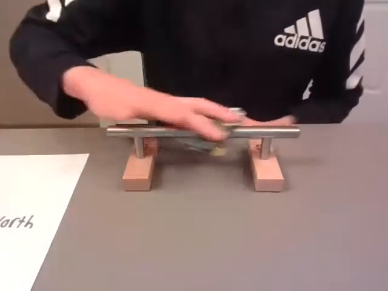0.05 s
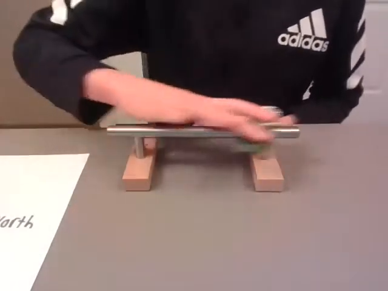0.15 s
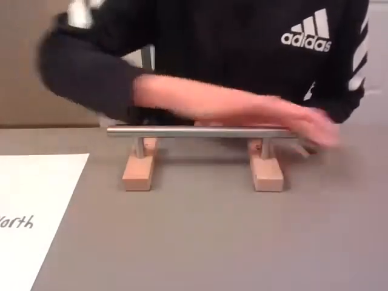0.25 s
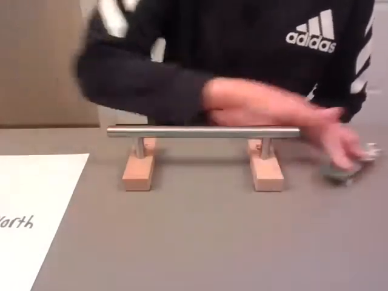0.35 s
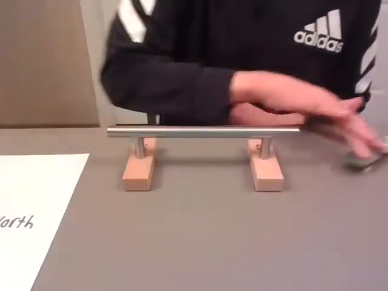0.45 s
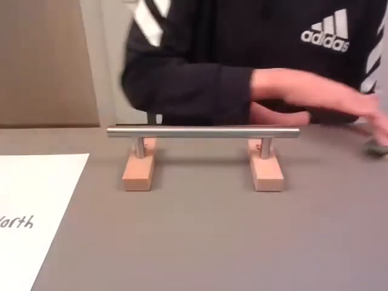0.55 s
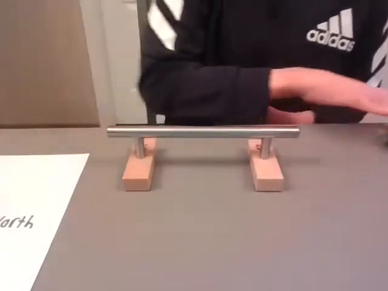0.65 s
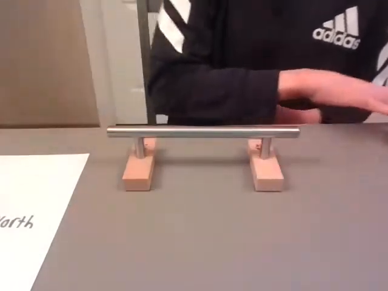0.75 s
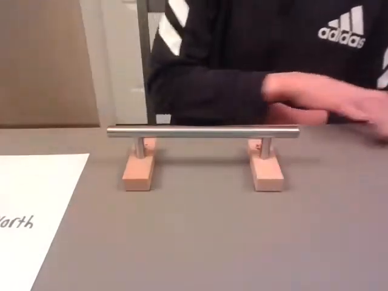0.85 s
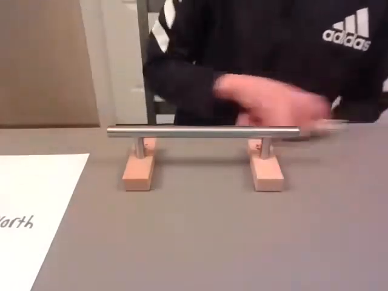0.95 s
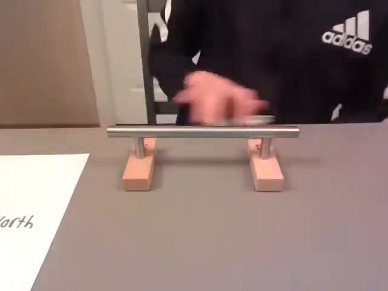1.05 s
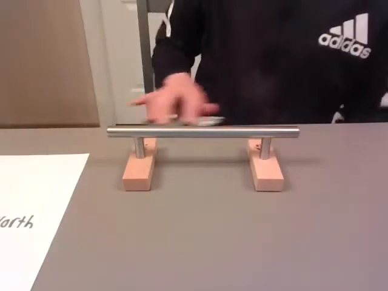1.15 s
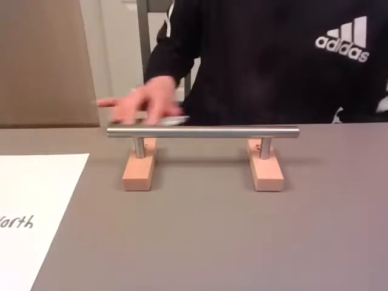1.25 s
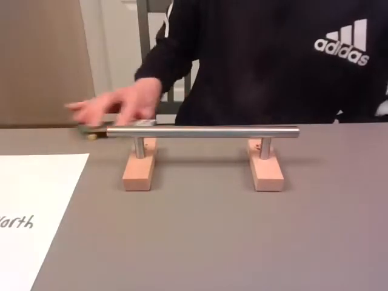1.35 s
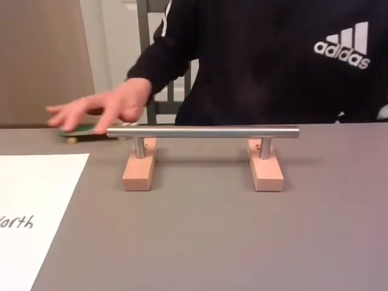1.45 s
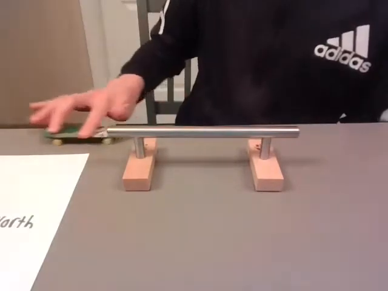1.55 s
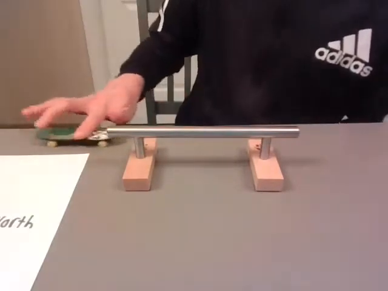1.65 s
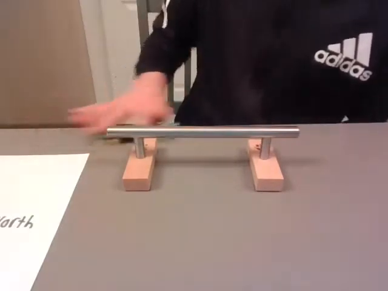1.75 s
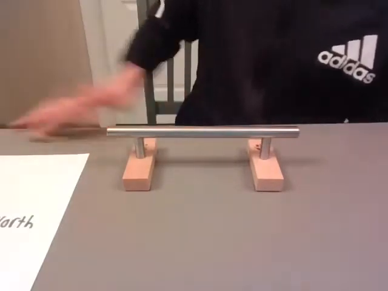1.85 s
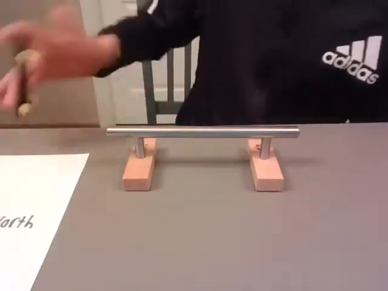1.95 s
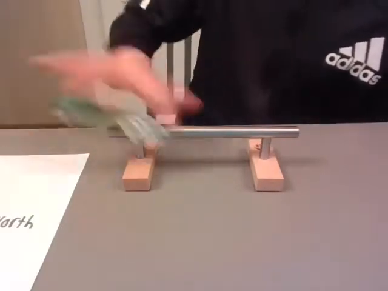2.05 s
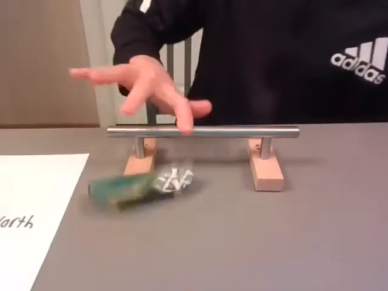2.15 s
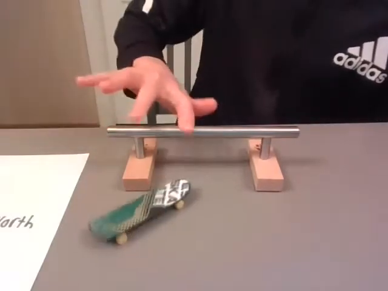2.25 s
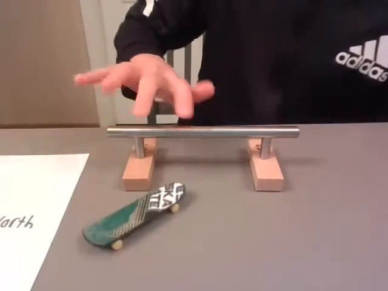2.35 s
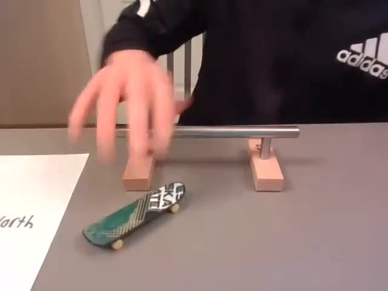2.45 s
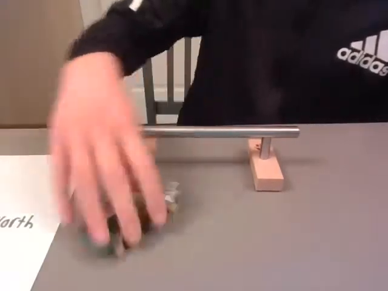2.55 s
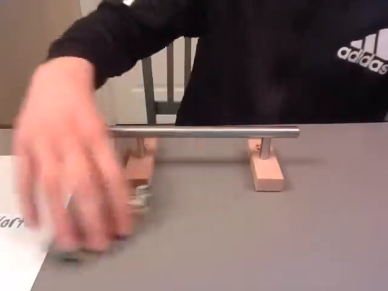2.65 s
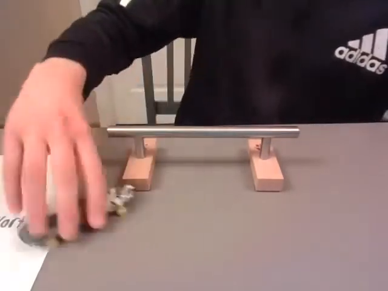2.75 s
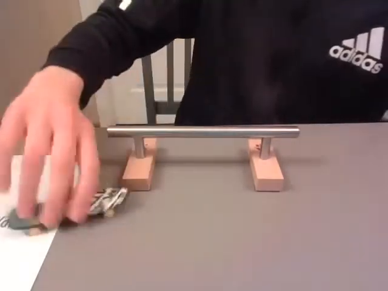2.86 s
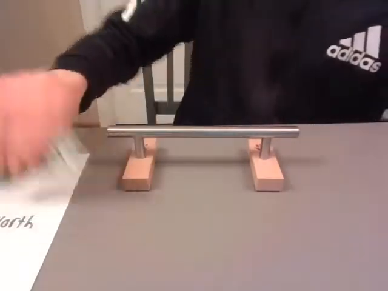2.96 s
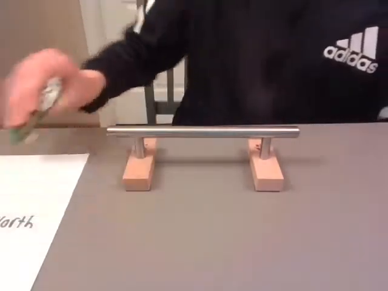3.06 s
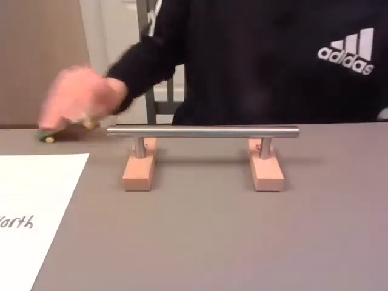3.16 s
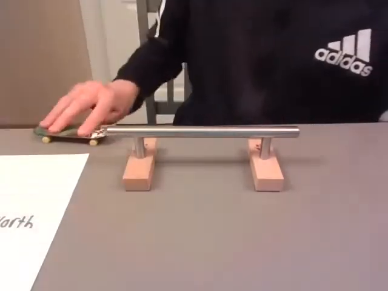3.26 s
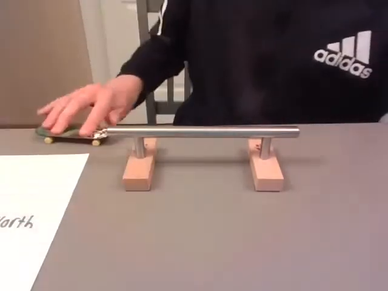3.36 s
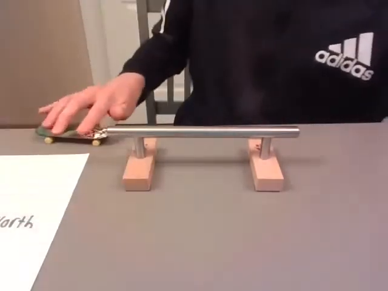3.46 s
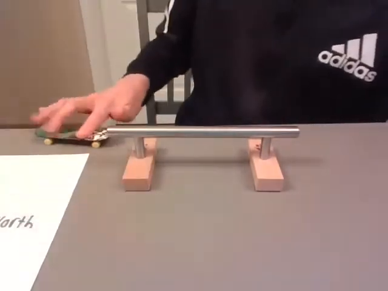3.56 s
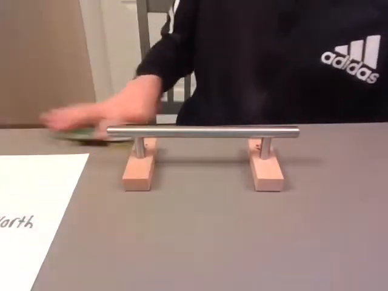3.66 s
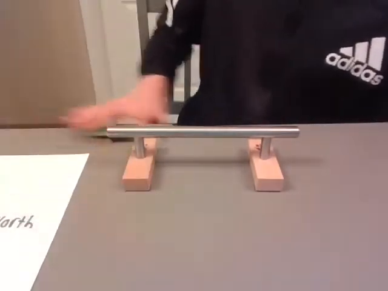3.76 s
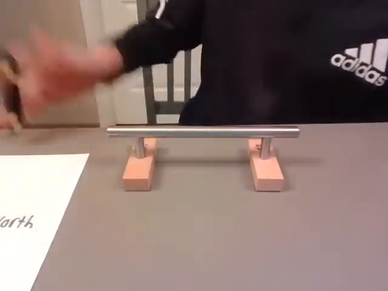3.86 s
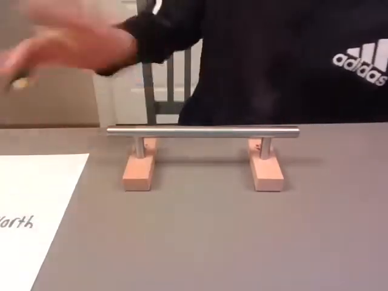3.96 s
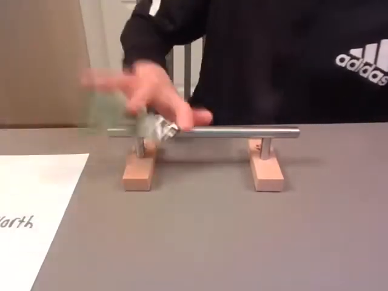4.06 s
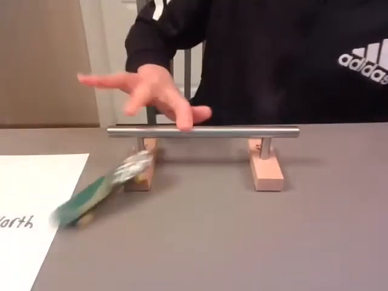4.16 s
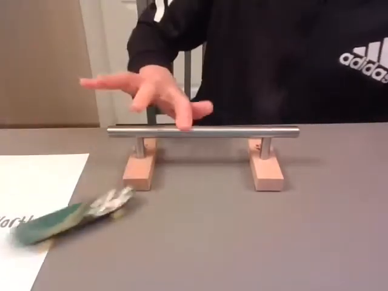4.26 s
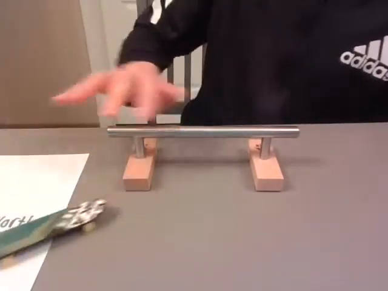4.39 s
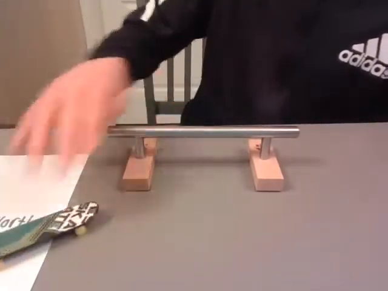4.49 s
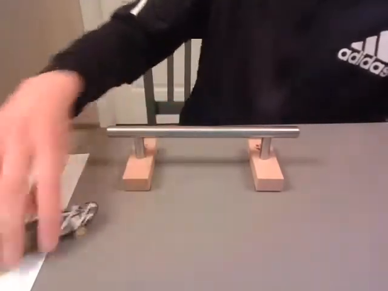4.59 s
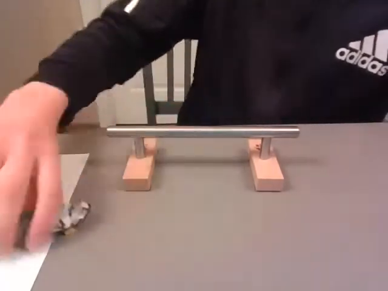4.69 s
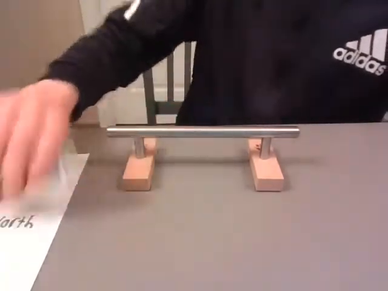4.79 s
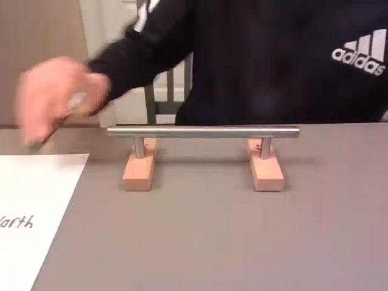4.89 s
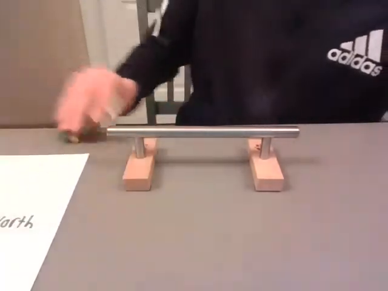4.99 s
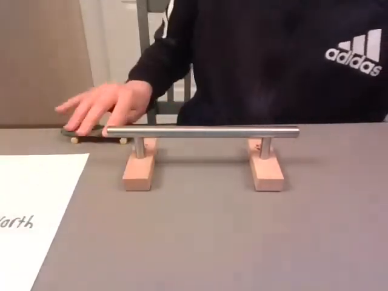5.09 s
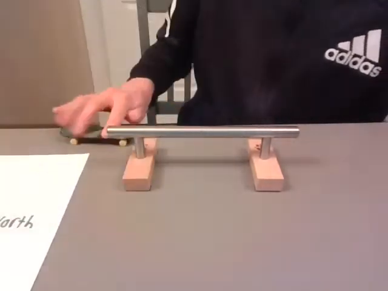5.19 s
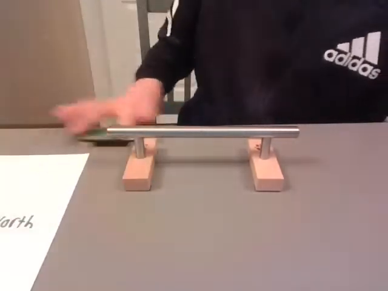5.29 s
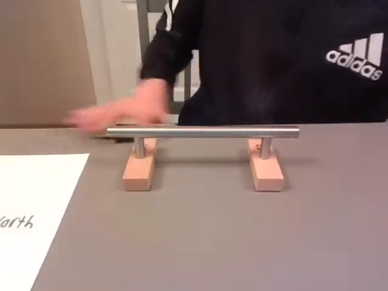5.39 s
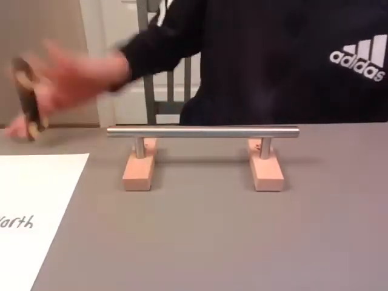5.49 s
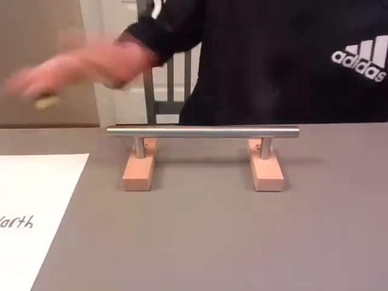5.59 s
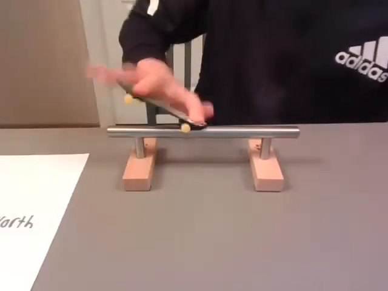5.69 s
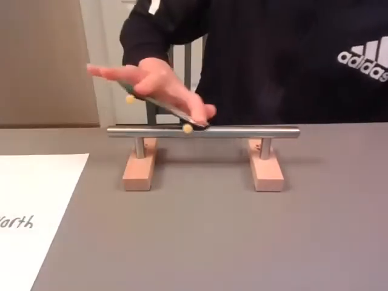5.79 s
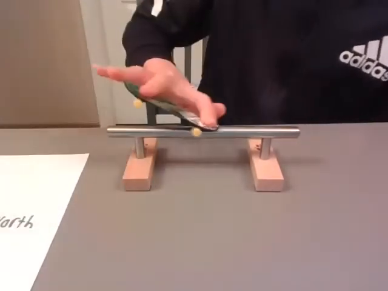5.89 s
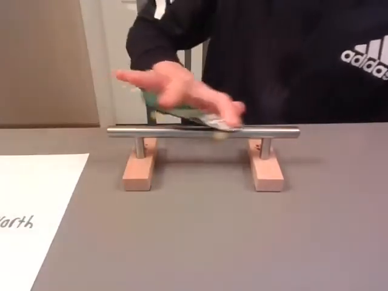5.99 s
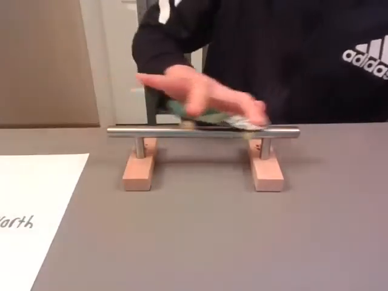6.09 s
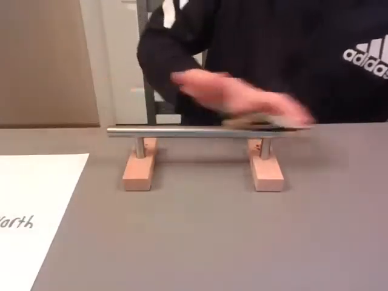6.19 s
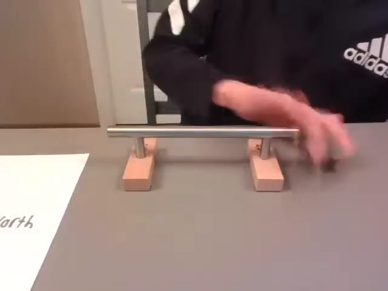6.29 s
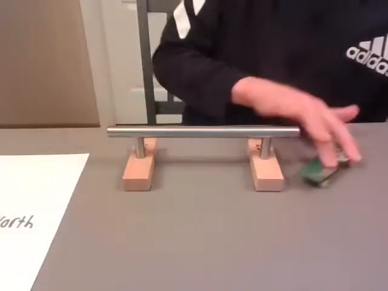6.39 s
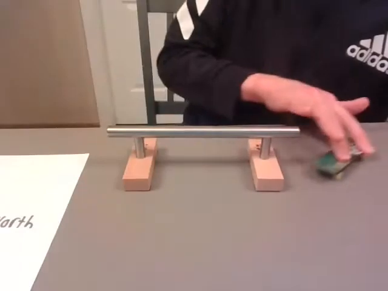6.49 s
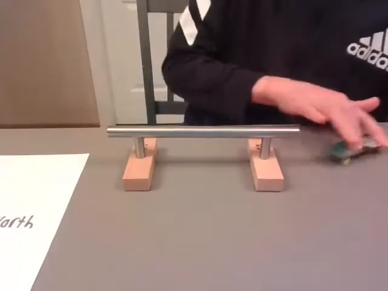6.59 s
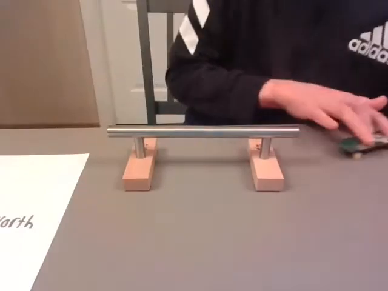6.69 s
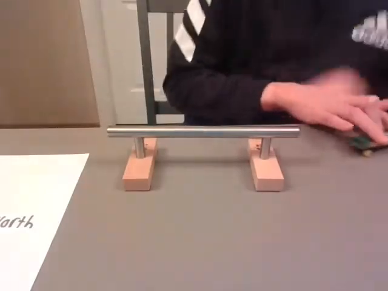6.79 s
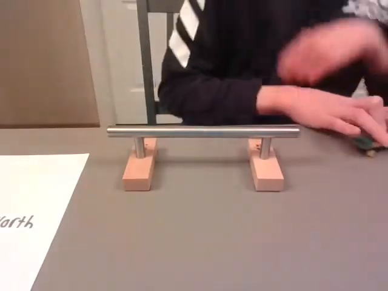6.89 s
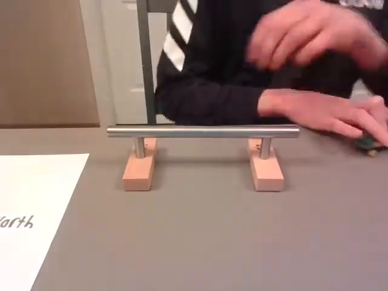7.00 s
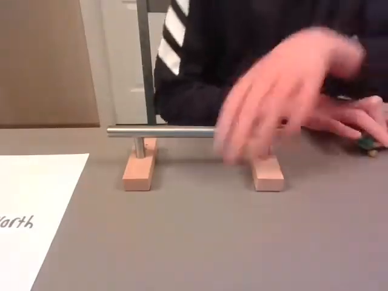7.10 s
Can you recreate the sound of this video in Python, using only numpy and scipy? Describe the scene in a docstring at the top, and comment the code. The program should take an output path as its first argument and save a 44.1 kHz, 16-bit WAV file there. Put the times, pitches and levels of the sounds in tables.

```python
"""A small metal truck scrapes briefly along a steel rail, then a fingerboard clatters, rolls and squeaks on a table.
Blows are noise bursts for the cracking deck plus decaying modes for its metal trucks and the booming table.
Wheels and rail are uneven contact noise that excites resonances; squeaks are gliding stick-slip tones.
After some pops the deck rings freely; the reflections of a small, bare room and its quiet air surround it all.
"""
import sys
import numpy as np
from scipy import signal
from scipy.fft import rfft, irfft, next_fast_len
from scipy.io import wavfile

SR = 44100
rng = np.random.default_rng(int(sys.argv[2]) if len(sys.argv) > 2 else 0)


def persist_wave(psi):
    """Save psi, clipped to +-1, as 16-bit WAV."""
    counts = np.round(np.clip(psi, -1, 1) * 32767).astype(np.int16)
    wavfile.write(sys.argv[1], SR, np.atleast_2d(counts).T)


N = 314874
TIME = np.arange(N) / SR

# run-ups, each a soft push, a hard push and a pop of the tail:
# pop t/s, soft push level/dB, hard push level/dB, hard push length/s, crack level/dB
RUN_UPS = [(1.869, -2, 0, 0.071, -14.5), (3.817, -5, 0, 0.07, -16), (5.448, -10.5, -3, 0.072, -18.5)]


def undb(db):
    """Level as a logarithm of amplitude: decibels to gain."""
    return 10 ** (np.asarray(db) / 20)


def unit(x):
    """Normalisation of the mean power: rms 1."""
    return x / np.sqrt(np.mean(x ** 2))


def fade(t, t60):
    """Exponential decay of a damped system, 60 dB down after t60."""
    return np.exp(-np.log(1000) * t / max(t60, 1 / SR))


def along(points, hz):
    """Interpolation of (f/Hz, value) points on a log-frequency axis."""
    f, value = np.transpose(points)
    return np.interp(np.log(hz + 1), np.log(f), value)


def colour(x, points):
    """Linear filtering: the spectrum is multiplied by gains given as (f/Hz, level/dB)."""
    size = next_fast_len(x.shape[-1], real=True)
    gain = undb(along(points, np.fft.rfftfreq(size, 1 / SR)))
    return irfft(rfft(x, size) * gain, size)[..., :x.shape[-1]]


def resonate(x, peaks):
    """Forced vibration of parallel damped resonators (f/Hz, width/Hz, level/dB)."""
    size = next_fast_len(x.shape[-1], real=True)
    f = np.fft.rfftfreq(size, 1 / SR) + 1
    response = sum(undb(db) / (1 + 1j * (f * f - hz * hz) / (f * width)) for hz, width, db in peaks)
    return irfft(rfft(x, size) * response, size)[..., :x.shape[-1]]


def spread(mid, side, side_db):
    """Mid-side stereo from two unrelated signals; the width depends on frequency."""
    # side minus mid before side_db is added: f/Hz, level/dB
    side_spectrum = [(100, -2.5), (400, -9.5), (1000, -12.5), (2000, 2), (8000, -2), (16000, -9.5)]
    return mid + undb(side_db) * colour(side, side_spectrum) * np.array([[1], [-1]])


def walk(rate):
    """Slow random drift: straight lines between normal draws, rate of them per second."""
    knots = np.arange(0, TIME[-1] + 1, 1 / rate)
    return np.interp(TIME, knots, rng.standard_normal(len(knots)))


def swell(curve):
    """Amplitude envelope along rows (t/s, level/dB), fading to silence outside them."""
    s, db = np.transpose(curve)
    edge = 0.025  # s
    window = np.interp(TIME, [s[0] - edge, s[0], s[-1], s[-1] + edge], [0, 1, 1, 0]) ** 2
    return undb(np.interp(TIME, s, db)) * window


def add(out, s, sound):
    """Superposition: mix a sound in at time s."""
    start = max(int(s * SR), 0)
    out[:, start:start + sound.shape[-1]] += sound[..., :N - start]


def ring(modes, t, scatter_db, detune):
    """Free modal vibration; the point of impact and the grip change the shares and pitch of the modes."""
    chance = rng.standard_normal((len(modes), 3))
    total = 0
    for (hz, db, t60), (level, shift, sign) in zip(modes, chance):
        gain = undb(db + scatter_db * level) * np.sign(sign)
        total = total + gain * np.sin(2 * np.pi * hz * (1 + detune * shift) * t) * fade(t, t60)
    return total


def burst(spectrum, t, hold, t60, side_db, hz=0, formant_db=-60):
    """High modal density acts as noise: short-lived deck modes, driven while the contact chatters."""
    noise = colour(rng.standard_normal((2, len(t))), spectrum)
    noise = noise + resonate(noise, [(hz, 900, formant_db)])  # formant of the struck part
    shape = fade(np.maximum(t - hold, 0), t60) * (1 - fade(t, 0.0057)) ** 2
    return unit(spread(*noise, side_db)) * shape


def asperities(grain_db):
    """Friction at rough surfaces: a dense train of tiny contacts of very uneven size."""
    sizes = np.repeat(rng.exponential(size=N // 16 + 1), 16)[:N]
    return unit(rng.standard_normal(N) * undb(grain_db * sizes))


def texture(grain_db, flutter_db, side_db):
    """Amplitude modulation of stereo contact noise by a fluttering pressure."""
    return spread(asperities(grain_db), asperities(grain_db), side_db) * undb(flutter_db * walk(70))


def waver(x, drift_s):
    """Doppler-like modulation by a drifting delay: shifting finger pressure bends the resonances a little."""
    late = TIME - drift_s * walk(18)
    return unit(np.array([np.interp(late, TIME, channel) for channel in x]))


def glance(x, share, lag_s, drift_s):
    """Comb filtering: the late bounce off table and hand has notches that wander as the board moves."""
    late = TIME - lag_s - drift_s * walk(6.2)
    return unit(x + share * np.array([np.interp(late, TIME, channel) for channel in x]))


def strikes():
    """Impact excitation: blows as (t/s, crack/dB, knock/dB, formant f/Hz, chatter/s, thump/dB)."""
    # blows of the board:
    # t/s, crack level/dB, wooden knock relative level/dB, formant of the struck part f/Hz, contact chatter/s
    clack_table = [(0.2104, -14, -32, 4040, 0.0012), (0.2753, 3.5, -8.5, 14900, 0.001),
                   (0.2886, -6.5, -17, 6860, 0.002), (0.2923, 5.5, -13, 15000, 0.0012),
                   (2.0598, 2, -33, 11250, 0.0019), (2.0785, -3.5, -19, 7700, 0.0022),
                   (2.1042, -13.5, -44, 4490, 0.0023), (2.133, -2.5, -19.5, 4940, 0.0024),
                   (2.164, 1.5, -36, 14100, 0.0017), (2.174, -5, -18.5, 11900, 0.0033),
                   (2.2288, -5, -26.5, 7400, 0.0019), (2.2343, -4.5, -20.5, 12500, .0014),
                   (2.598, -23, -34.5, 5570, 0.0029), (2.83, -23.5, -36, 11900, 0.0012),
                   (2.9304, -34.5, -43, 7140, .004), (3.1527, -5.5, -28.5, 14000, 0.00053),
                   (3.2316, -10.5, -26.5, 12900, 0.0026), (3.8426, -18, -41.5, 12500, 0.0017),
                   (4.0344, -4, -32, 13600, 0.0053), (4.0446, -1.5, -32, 13000, 0.0014),
                   (4.1183, 1, -13, 3900, 0.0019), (4.1582, -2.5, -32, 7100, 0.0015),
                   (4.167, -1.5, -26, 4130, 0.00096), (4.2379, -1, -28, 12900, 0.00086),
                   (4.2565, -11, -23, 12600, 0.0023), (4.6029, -25.5, -33.5, 5460, 0.0013),
                   (4.6558, -11.5, -24.5, 11400, 0.0018), (4.732, -18.5, -36.5, 13230, 0.0051),
                   (5.0075, -15, -31, 14900, 0.0032), (5.07, -11.5, -32, 7400, .0007),
                   (5.0859, -9, -23, 8840, .0007), (5.4572, -17.5, -45, 12700, 0.0027),
                   (5.6352, 4.5, -19, 10000, 0.0012), (6.2235, -26.5, -51.5, 7350, 0.0015),
                   (6.279, -8, -46, 7200, 0.0019), (6.2992, 0, -21, 12600, 0.0016),
                   (6.321, 0, -19.5, 14800, 0.0054), (6.3301, 1, -23, 14800, 0.0014)]
    # boom under a 0 dB crack (before the common trim of thumps), and dB of boom per dB of crack
    thump_db, thump_law = -36, 0.66
    pop_knock_db, pop_hz, pop_chatter_s, pop_thump_db = -36.5, 12840, 0.0059, -32.5
    blow_list = []
    for s, db, knock_db, hz, chatter in clack_table:
        blow_list.append((s, db, knock_db, hz, chatter, thump_db + thump_law * db))
    for s, *_, db in RUN_UPS:
        blow_list.append((s, db, pop_knock_db, pop_hz, pop_chatter_s, pop_thump_db))
    return blow_list


def blows(count=3):
    """Impact radiation at pops, landings and tumbles: deck cracks and knocks, trucks ring and rattle in their play."""
    # crack of the deck: f/Hz, relative level/dB
    deck_spectrum = [(1500, -13.5), (3000, -7), (5000, -2.5), (7500, 0), (9300, -1.5), (12500, 0),
                     (14500, -1.5), (16000, 5)]
    # wooden knock: f/Hz, relative level/dB
    knock_spectrum = [(150, -20), (350, -4), (600, -10.5), (1200, -2.5), (2400, -4.5), (4500, -13.5),
                      (8000, -29)]
    # modes of the metal trucks: f/Hz, relative level/dB, t60/s
    truck_modes = [(1200, -9, .2), (4520, -3, 0.2), (4882, -10, 0.18), (7160, -3.5, .16), (7830, -3, 0.13),
                   (11430, -7, .12), (12100, -3, .12), (12490, 1, .12)]
    metal_db, pan_db = -34, -0.5  # ring re the crack; left minus right
    pan = undb(np.array([[pan_db], [-pan_db]]) / 2)
    out, t = np.zeros((2, N)), np.arange(2 ** 13 + 2 ** 12) / SR
    for s, db, knock_db, hz, chatter, _ in strikes():
        crack = undb(db) * burst(deck_spectrum, t, chatter, t60=0.019, side_db=-2, hz=hz, formant_db=7)
        knock = undb(knock_db + 1.5) * burst(knock_spectrum, t, chatter, t60=0.025, side_db=-2.0)
        trucks = undb(db + metal_db) * ring(truck_modes, t, scatter_db=3.5, detune=0.0023)
        add(out, s, (crack + knock + trucks) * pan)
        for delay in rng.uniform(0.0079, 0.031, count):
            rattle = burst(deck_spectrum, t[:512], hold=0, t60=0.0063, side_db=0)
            add(out, s + delay, undb(db - 23.5) * rattle)
    return out


def flights():
    """Free vibration: lifted off the table, nothing damps the deck and its bending modes sing on."""
    # pops that leave the deck ringing in the air: t/s, relative level/dB
    pop_table = [(1.86, -48.5), (3.82, -38.5), (4.121, -38), (5.45, -41), (5.636, -43)]
    # bending modes of the free deck: f/Hz, relative level/dB, t60/s
    deck_modes = [(1210, -0.5, 0.37), (1326, -3, 0.66), (1440, -3, 0.55), (2080, -1, 0.25), (2260, -7.5, 1)]
    out, t = np.zeros((2, N)), np.arange(2 ** 14) / SR
    for s, db in pop_table:
        tone = ring(deck_modes, t, scatter_db=6.5, detune=0.011)
        add(out, s, undb(db - 7) * tone * (1 - fade(t, 0.017)))
    return out


def push(start, rise, hold, end, fall_db_per_s, stop):
    """Drive and frictional loss of the wheels, 0-1: they speed up, are held, run down and stop."""
    rising = np.clip((TIME - start) / rise, 0, 1) ** 2
    coasting = undb(-fall_db_per_s * np.maximum(TIME - start - rise - hold, 0))
    return rising * coasting * np.clip((end - TIME) / stop, 0, 1)


def rolling():
    """Power laws of rolling noise: one drive moves rumble, whirr and hiss, the hiss most steeply."""
    # free rides across the table: start t/s, speeding up/s, held/s, end t/s,
    # whirr level/dB re a full push, rumble of that part of the table level/dB
    ride_table = [(0.39, 0.026, 0.017, 0.713, -12, -34.5), (0.765, 0.12, 0.13, 1.67, 0, -38.5),
                  (2.54, 0.068, 0.051, 2.84, -16, -42.5), (6.48, 0.046, .01, 6.76, -17, -37)]
    # the board scuffs the table under the fingers: start t/s, length/s, whirr level/dB, hiss level/dB
    scuff_table = [(1.094, .05, -51, -28.5), (2.569, 0.0077, -48.5, -40), (2.813, 0.0084, -40.5, -49),
                   (2.893, 0.0093, -42.5, -33), (6.79, 0.088, -63.5, -54.5)]
    coast_db_per_s, stop_s = 57, 0.077  # the board loses speed, then the fingers stop it
    # the soft push peaks this long before the pop
    soft_lead_s, soft_rise_s, soft_fall_db_per_s = 0.12, 0.094, 260.5
    hard_rise_s, lift_s = 0.027, 0.017  # the wheels bite; they leave the table around the pop
    whirr_full_db, hiss_full_db, run_up_rumble_db = -29, -27.5, -38.5  # at a full push
    rumble_law, hiss_law = 0.48, 1.38  # powers of the drive
    drives = []
    for start, rise, hold, end, db, rumble_db in ride_table:
        drive = undb(db) * push(start, rise, hold, end, coast_db_per_s, stop_s)
        drives.append((drive, rumble_db))
    for pop, soft_db, hard_db, length, _ in RUN_UPS:
        soft_start = pop - soft_lead_s - soft_rise_s
        soft = undb(soft_db) * push(soft_start, soft_rise_s, 0, pop, soft_fall_db_per_s, lift_s)
        hard = undb(hard_db) * push(pop - length, hard_rise_s, length, pop + lift_s / 2, 0, lift_s)
        drives.append((np.maximum(soft, hard), run_up_rumble_db))
    drumming = sum(undb(rumble_db) * drive ** rumble_law for drive, rumble_db in drives)
    whirring = undb(whirr_full_db) * sum(drive for drive, _ in drives)
    hissing = undb(hiss_full_db) * sum(drive ** hiss_law for drive, _ in drives)
    for s, length, whirr_db, hiss_db in scuff_table:
        scuff = swell([(s, 0), (s + length, 0)])
        whirring = whirring + undb(whirr_db) * scuff
        hissing = hissing + undb(hiss_db) * scuff
    return drumming, whirring, hissing


def wheels():
    """Roughness excitation: wheels drum the tabletop and whirr on their axles; pressed harder they hiss with grit."""
    # tabletop drummed by the wheels: f/Hz, width/Hz, relative level/dB
    tabletop_peaks = [(125.6, 7.3, 13), (188, 53, -7), (230, 40, -10.5), (445, 20, -2), (530, 130, -4.5),
                      (718, 62, -6.5), (811, 28, 2.5), (940, 25, -23)]
    # whirr of the wheels: f/Hz, relative level/dB
    wheel_spectrum = [(700, -26.5), (1250, -3.5), (1600, -2.5), (2150, 0.5), (3000, -5), (3800, -6.5),
                      (4900, -6), (6200, -16), (7300, -12.5), (9500, -23), (16000, -30.5)]
    # resonances of the wheels: f/Hz, width/Hz, relative level/dB
    wheel_peaks = [(1276, 39, 6), (1866, 50, 4), (2090, 120, -13), (3046, 170, -0.5), (5140, 500, -21)]
    # hiss of the grit: f/Hz, relative level/dB
    grit_spectrum = [(3800, -25), (5000, -3.5), (6200, -4), (7400, -1), (9000, -6), (10500, -4.5),
                     (12500, 0.5), (14000, -4.5), (16000, -1.5)]
    drumming, whirring, hissing = rolling()
    grain = texture(grain_db=2.5, flutter_db=1.5, side_db=-4.5)
    rumble = undb(-3.5) * unit(resonate(grain, tabletop_peaks))
    ring_grain = texture(grain_db=4.5, flutter_db=3.5, side_db=0.5)
    rings = waver(resonate(ring_grain, wheel_peaks), drift_s=0.0015)
    whirr = unit(colour(grain, wheel_spectrum)) + undb(-5.0) * rings
    whirr = undb(1.0) * glance(whirr, share=0.082, lag_s=0.001305, drift_s=0.00021)
    grit = colour(texture(grain_db=2.0, flutter_db=2.0, side_db=-8.5), grit_spectrum)
    grit = undb(-3.0) * glance(grit, share=0.18, lag_s=0.00085, drift_s=0.00005)
    return drumming * rumble + whirring * whirr + hissing * grit


def spins():
    """Narrow-band resonance: loose wheels rattle on their axles and weaken slightly as they run down."""
    # whirring wheels: start t/s, end t/s, rattle f/Hz, level/dB
    spin_table = [(0.917, 1.182, 5020, -31), (1.177, 1.28, 12500, -46), (1.82, 1.853, 2190, -28.5),
                  (2.646, 2.824, 10900, -51), (3.247, 3.33, 12500, -50.5), (4.27, 4.526, 12600, -66),
                  (5.41, 5.432, 2150, -34)]
    out, grain = 0, texture(grain_db=3.5, flutter_db=9.5, side_db=0.5)
    for start, end, hz, db in spin_table:
        axle = [(hz, 1000, 0)]
        rattle = unit(resonate(resonate(grain, axle), axle))
        out = out + swell([(start, db), (end, db - 0.5)]) * rattle
    return out


def rail():
    """Sliding friction: the truck rubs along the steel; the posts carry a rumble into the table."""
    # truck sliding on the rail: start t/s, end t/s, relative level/dB at the start, relative level/dB near the end
    grind_table = [(0.0, 0.203, -37.5, -41), (5.896, 6.226, -47.5, -41.5)]
    # resonances of board and rail in each grind: f/Hz, width/Hz, relative level/dB
    first_peaks = [(2280, 110, -3), (4020, 300, -9.5), (8000, 500, -1), (11100, 550, -1),
                   (14000, 900, -5.5)]
    second_peaks = [(1130, 220, -8), (2250, 180, -11.5), (4160, 300, -13), (5420, 182, -14.5),
                    (7430, 1200, -17), (12400, 510, -0.5)]
    scrape_spectrum = [(500, -16), (1200, 7.5), (6000, 4.0), (8000, 3.5), (15000, -1.5)]
    post_spectrum, post_peaks = [(200, 18.0), (600, -20.5)], [(92, 15, -2), (127.6, 15, 1), (154, 6.9, -1.6)]
    catch_s, catch_db = 0.035, 6.5  # the truck catches just before it leaves the rail
    out = 0
    for (start, end, start_db, end_db), peaks in zip(grind_table, (first_peaks, second_peaks)):
        curve = [(start, start_db), (end - catch_s, end_db), (end, end_db + catch_db)]
        rub = texture(grain_db=1.5, flutter_db=-1.0, side_db=-14.5)
        steel = undb(-8) * waver(resonate(rub, peaks), drift_s=0.00043)
        scrape = undb(-16) * unit(colour(rub, scrape_spectrum))
        rumble = undb(-9.0) * unit(resonate(colour(rub, post_spectrum), post_peaks))
        out = out + swell(curve) * (steel + scrape + rumble)
    return out


def squeaks(pan_db=-6):
    """Stick-slip oscillation: a wheel whistles very high, swells and turns ragged, mostly on the right."""
    # wheel squeaks: start t/s, length/s, f/Hz, relative level/dB, roughness 0-1
    squeak_table = [(0.56, 0.014, 14200, -47, 0.16), (0.641, 0.015, 14340, -41.5, 0.2),
                    (1.13, 0.014, 12300, -26.5, 0.6), (1.671, 0.036, 14350, -17.5, 0.05),
                    (1.688, 0.027, 14650, -14, 0.84)]
    out = np.zeros((2, N))
    for s, length, hz, db, rough in squeak_table:
        u = np.linspace(0, 1, int(length * SR))
        pitch = hz + rough * 800 * walk(1500)[:len(u)]
        shape = np.sqrt(np.abs(np.sin(np.pi * u))) * (1 + u)
        phase = 2 * np.pi * np.cumsum(pitch) / SR + np.array([[0], [np.pi / 2]])  # the nearer side leads
        gain = undb(db + 1.0 + np.array([[pan_db], [-pan_db]]) / 2)
        add(out, s, gain * shape * np.sin(phase))
    return out


def thumps():
    """Plate modes: the tabletop booms under the board; soft flesh wakes mainly its lowest modes."""
    # heavy pushes of hand and arm on the table: t/s, relative level/dB
    bump_table = [(0.235, -28), (0.289, -28.5), (1.873, -29), (2.061, -21), (2.09, -18.5), (3.486, -46),
                  (4.04, -18), (4.606, -27.5), (5.011, -34.5), (5.072, -31.5), (5.637, -20.5),
                  (5.765, -25.5), (6.223, -36), (6.301, -31.5), (6.722, -39)]
    # modes of the table: f/Hz, relative level/dB, t60/s
    table_modes = [(44.3, 1.5, 0.41), (78.6, -5.5, 0.36), (105.8, 6, 0.21), (131, 4, 0.35),
                   (161.1, -9, 0.58), (185.5, -10.5, 0.39), (218, -6.5, 0.14), (257.3, -12, 0.38),
                   (318, -19, 0.29), (494, -4, 0.16), (782, -15.5, 0.23), (835, -23, 0.86)]
    flesh_spectrum = [(110, -6.5), (200, -3.5), (500, -27)]
    out, t = np.zeros((2, N)), np.arange(2 ** 15) / SR
    for s, *_, thump_db in strikes():
        boom = ring(table_modes, t, scatter_db=4.5, detune=0.02)
        add(out, s, undb(thump_db - 3.5) * boom * (1 - fade(t, 0.05)))
    for s, db in bump_table:
        thud = colour(ring(table_modes, t, scatter_db=-1.0, detune=0.017), flesh_spectrum)
        add(out, s, undb(db - 3.0) * thud * (1 - fade(t, 0.059)))
    return out


def reflections():
    """Diffuse reverberation of the near walls for one place on the table; the high treble dies first."""
    # reverberation time: f/Hz, t60/s
    decay_times = [(80, 0.81), (210, 0.46), (560, 0.6), (1470, .46), (3880, 0.42), (10200, 0.28),
                   (16000, 0.22)]
    # reflected sound re direct sound: f/Hz, level/dB
    wall_gains = [(60, -16), (300, 1), (1000, 0), (3000, -5), (8000, -3), (16000, -10)]
    t = np.arange(2 ** 15) / SR
    noise = rfft(spread(*rng.standard_normal((2, len(t))), 0))
    centres = np.geomspace(60, 16000, 12)
    response = 0
    for hz, share in zip(centres, np.eye(len(centres))):
        band = irfft(noise * along(np.c_[centres, share], np.fft.rfftfreq(len(t), 1 / SR)))
        # the first reflections set in after 2 ms
        decay = fade(t, along(decay_times, hz)) * np.clip((t - 0.002) / 0.003, 0, 1)
        scale = undb(along(wall_gains, hz)) / np.sqrt(2 * np.sum(decay ** 2))
        response = response + band * decay * scale
    return response


def room(x, count=4):
    """Convolution with a varying room response: the reflections keep changing as board and hand move about."""
    place = TIME * 2 * np.pi % count  # cycles through the places, crossfading
    out = 0
    for own in np.eye(count):
        share = np.interp(place, np.arange(count), own, period=count)
        out = out + signal.fftconvolve(x * np.sqrt(share), reflections(), axes=1)[:, :N]
    return out


def air():
    """Stationary background noise: low rumble and faint hiss of the quiet room."""
    # room noise: f/Hz, relative level/dB
    air_spectrum = [(25, -6), (44, -0.5), (70, -20.5), (125, -10.5), (250, -26), (850, -35), (3500, -44.5),
                    (16000, -38)]
    noise = colour(rng.standard_normal((2, N)), air_spectrum)
    return undb(-53) * unit(spread(*noise, -1.3))


def scene():
    """Superposition of board and rail, heard directly and from the walls, over the boom of the table."""
    direct = blows() + flights() + wheels() + spins() + rail() + squeaks()
    return direct + room(direct) + thumps() + air()


def record(dry):
    """Overload and band-limiting: the loudest cracks clip in the recorder; the top is cut."""
    top_hz = 15900
    low_pass = signal.ellip(10, 0.2, 70, top_hz, fs=SR, output="sos")
    return signal.sosfilt(low_pass, np.clip(dry, -1, 1))


dry = scene()
out = record(dry)
persist_wave(out)
```